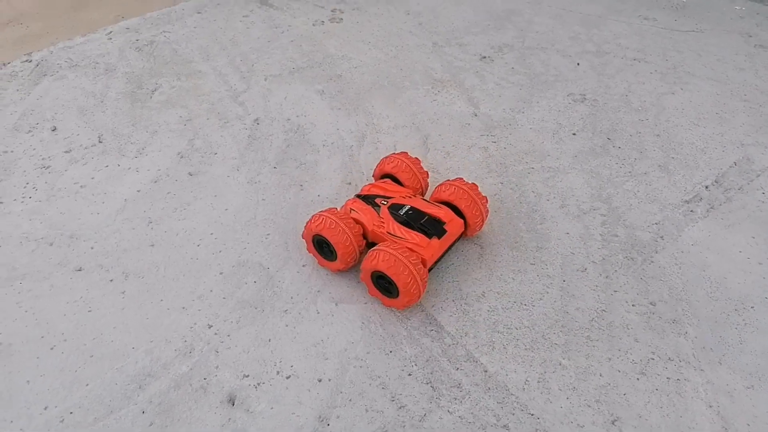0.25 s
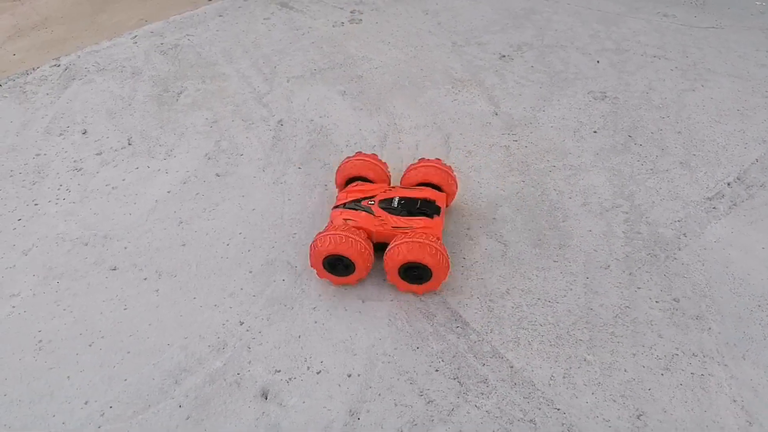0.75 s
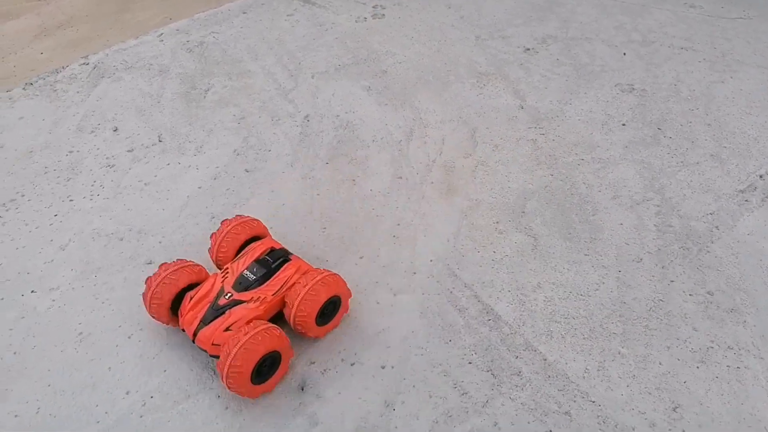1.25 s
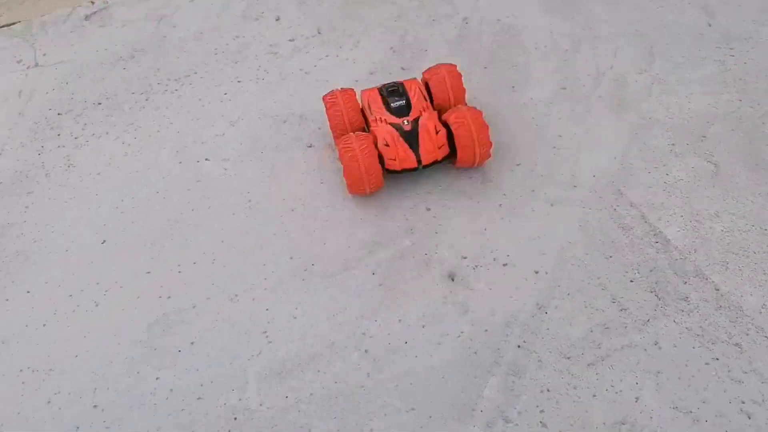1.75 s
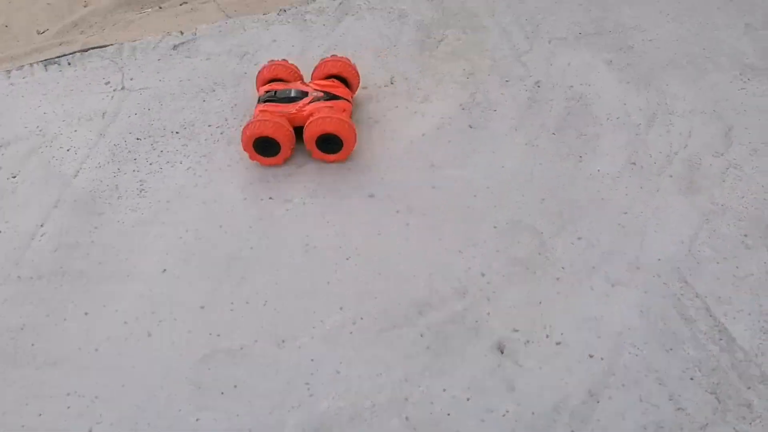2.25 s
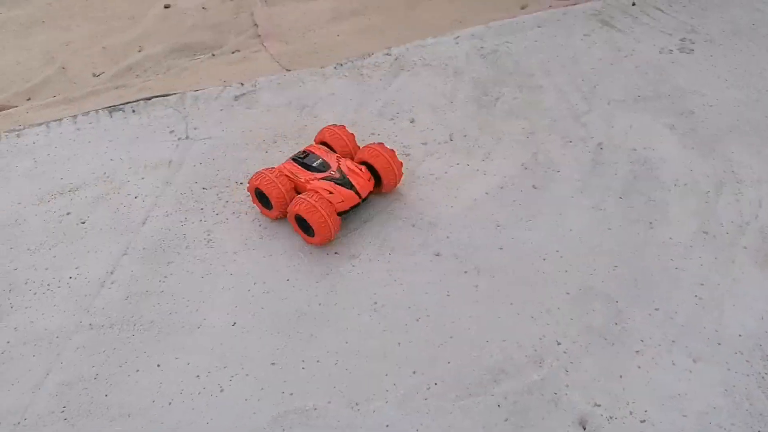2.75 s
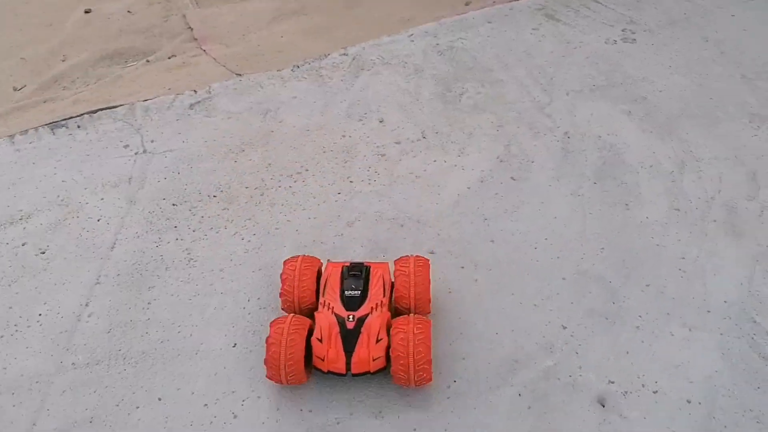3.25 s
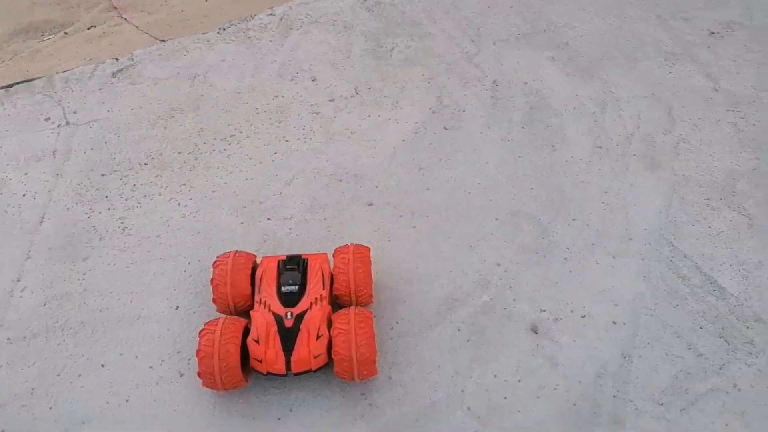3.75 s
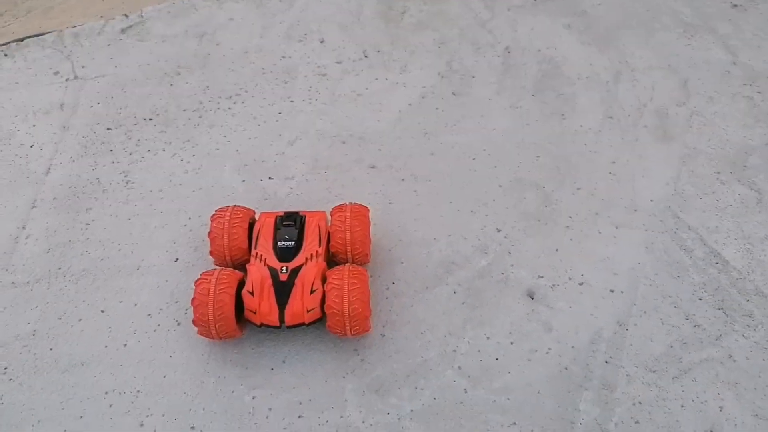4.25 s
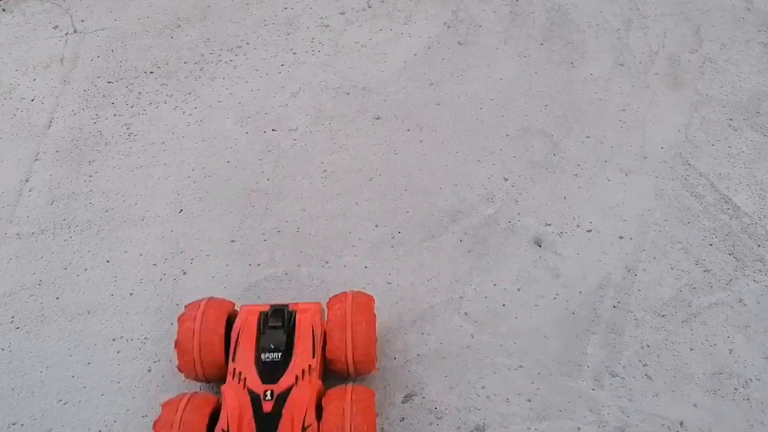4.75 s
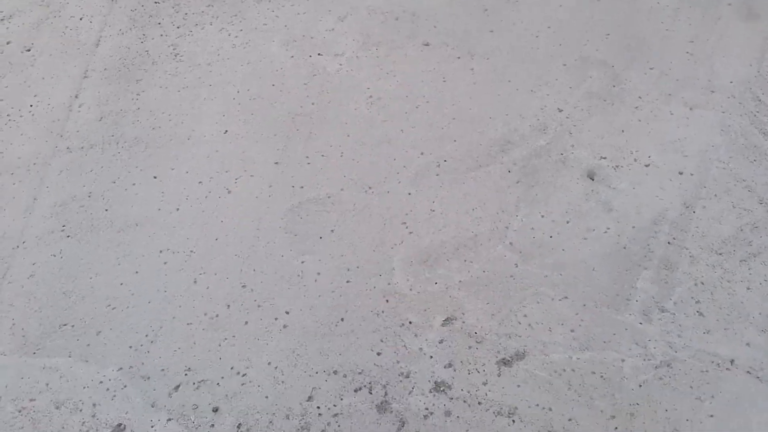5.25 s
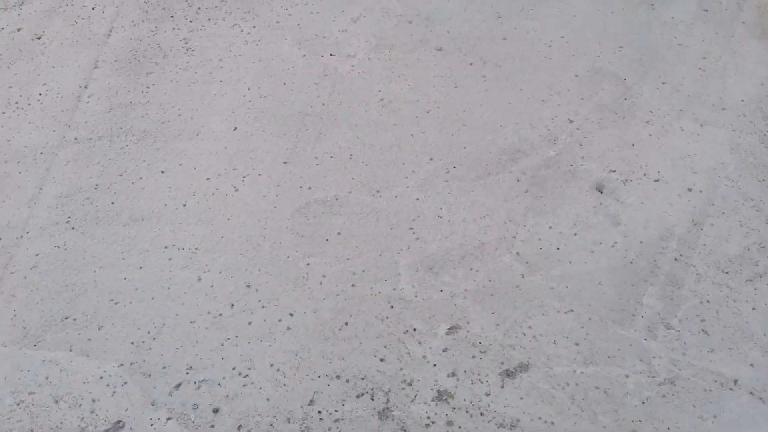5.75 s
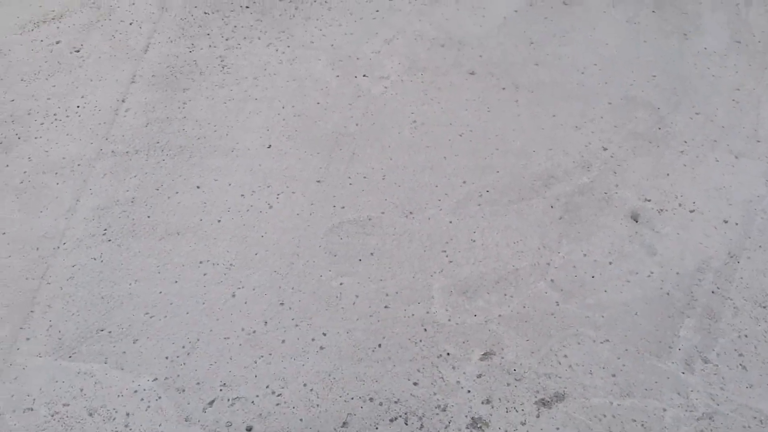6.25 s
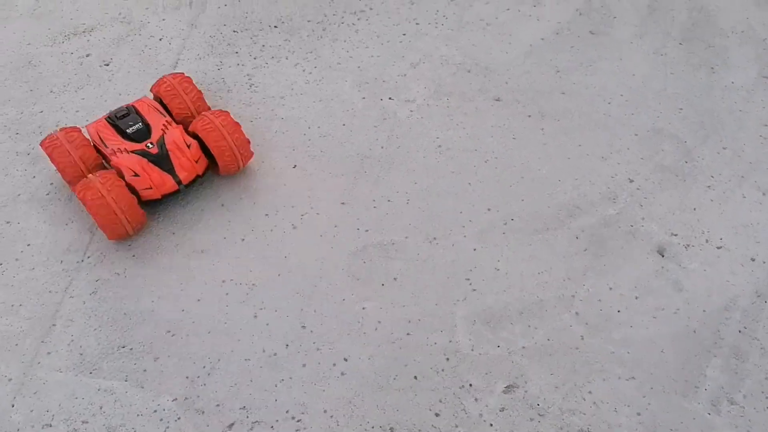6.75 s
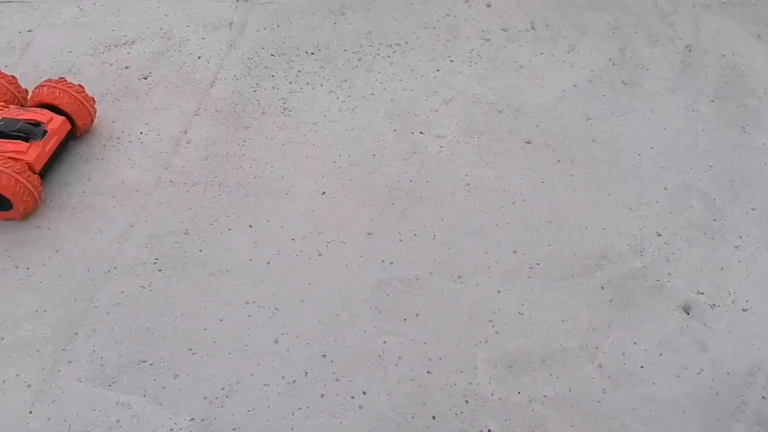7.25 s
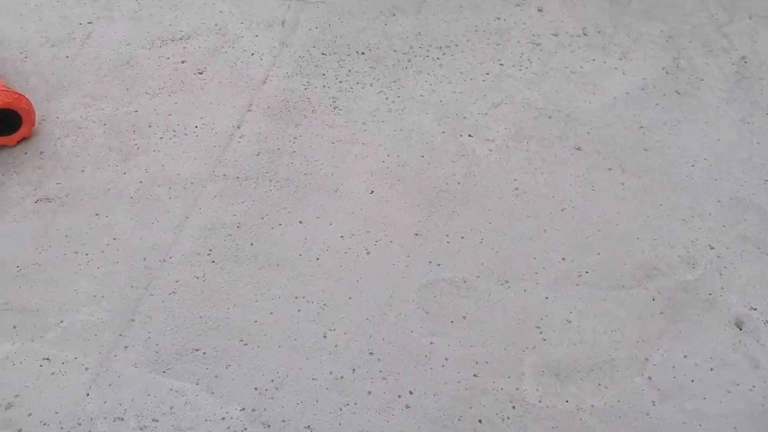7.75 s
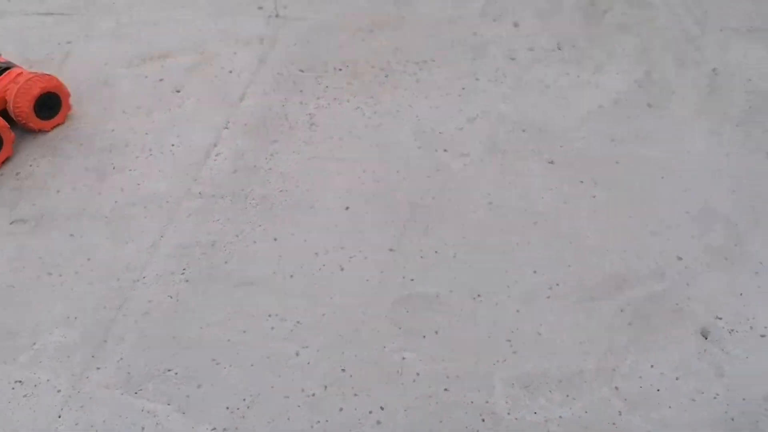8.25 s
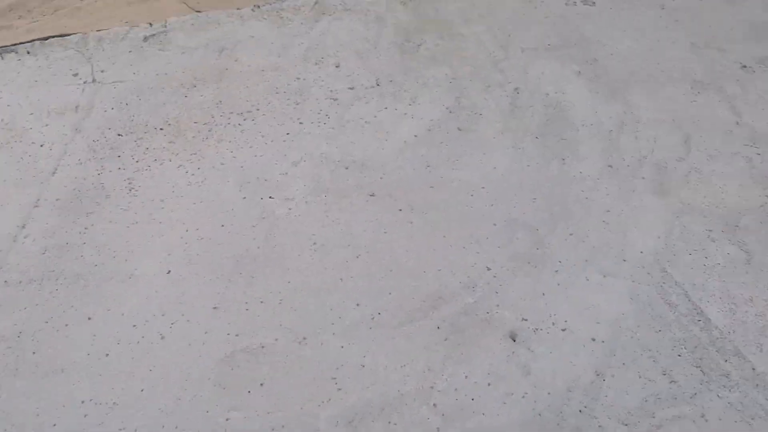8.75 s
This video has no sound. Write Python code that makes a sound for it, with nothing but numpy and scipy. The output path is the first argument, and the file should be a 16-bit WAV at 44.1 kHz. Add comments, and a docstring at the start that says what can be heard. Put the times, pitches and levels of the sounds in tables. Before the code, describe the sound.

Close stereo pickup outdoors: tiny motors and plastic gears buzz at a middling-high pitch, wavering as tyres grip and slip. Short weak revs come first, then stronger sustained whirring with dull bumps, a rumbling run over concrete, a pause, and a wilder passage of whining, scraping grit and hollow thumps. A brief drop precedes a final loud surge, over a very quiet rumbling background.

```python
"""A toy remote-control car whines and rattles in short bursts as it darts about on outdoor concrete, close by.
Its two small motors, one a side, are driven in stages and coast in between; they are heard as the tooth strikes
of plastic gears. The gears rattle the shell, made from tiny random impacts. Hollow knobbly tyres drum,
bump and skid on the grit, made from filtered impacts, short ringing blows and fizzing noise.
Behind them lie a faint wash of air, a low rumble and swells of hum, all made from filtered noise."""
import sys
import numpy as np
from scipy import signal
from scipy.fft import rfft, irfft
from scipy.io import wavfile
from scipy.ndimage import uniform_filter1d, minimum_filter1d, map_coordinates

SR = 44100
rng = np.random.default_rng(int(sys.argv[2]) if len(sys.argv) > 2 else 0)


def master(y):
    """Save y as 16-bit WAV."""
    cut = np.clip(np.atleast_2d(y).T, -1, 1)
    pcm = np.round(cut * 32767)  # scale
    wavfile.write(sys.argv[1], SR, pcm.astype(np.int16))


N = 396900
T = np.arange(N) / SR


def throttle():
    """Each stage draws the motors toward a new speed and loads the gears; then friction slows and quietens them."""
    # The stages of the driving. Each row: start in seconds, time held in seconds, tooth rate aimed at in Hz,
    # the same for the other side in Hz, slowing afterwards in Hz per second, attack in seconds,
    # gear level in dB, rattle level in dB, tyre drumming level in dB, roughness from 0 to 1,
    # lift of the octave overtone in dB, lift of the higher overtones in dB,
    # grit under the rolling tyres against the rattle in dB.
    stages = [ (-.1, 0.066, 590, 697, 2200, 0.021, -33.5, -35.5, -42, 0.23, -6, 1, -3),
              (.205, 0.17, 1138, 963, 1980, 0.032, -22, -28.5, -40, 0.34, -2.5, 4.5, 1),
              (.4, .14, 1300, 1220, 5000, 0.035, -23.5, -26.5, -40, 0.4, 2, 2, -4),
              (.55, .15, 1290, 1239, 5504, .025, -23, -27, -41, 0.28, 9.5, 2, -3),
              (.76, 0.032, 1004, 1093, 2000, 0.014, -24.5, -32.5, -46, 0.55, -4, -2, -5.5),
              (.91, 0.16, 1240, 1124, 3010, 0.027, -25, -36, -47, .28, 4.5, -3, 2.5),
              (1.121, 0.08, 950, 1267, 2492, 0.03, -28.5, -35.5, -45, 0.59, 3, 4, 2.5),
              (1.33, .14, 596, 897, 3517, 0.097, -26.5, -35, -36, 0.65, -8, 7, -11),
              (1.52, 0.19, 956, 996, 199.7, 0.061, -17, -27.5, -45, 0.39, 8.5, 6.5, -1),
              (1.75, 0.089, 901, 1287, 200, 0.019, -21.5, -27, -45, .33, 1, -7, -4.5),
              (1.85, .11, 869, 904, 950, .021, -18, -29, -45, 0.42, 7.5, -8, -1),
              (2.56, 0.21, 1249, 1157, 2008, 0.088, -20, -20.5, -38, 0.33, 7, 5, -5),
              (2.8, .45, 1372, 1326, 3992, 0.11, -19, -21.5, -41, 0.31, 4.5, 5, -1.5),
              (3.32, .19, 1096, 1057, 5995, 0.028, -19.5, -29.5, -32.5, .28, -7, -4, -1),
              (3.835, 0.19, 1020, 1209, 2000, 0.058, -21.5, -34, -37, .5, -15, -9, -9),
              (4.035, 0.22, 931.3, 903, 2015, 0.012, -18, -24.5, -35.5, 0.23, -7.5, -6, -0.5),
              (4.285, 0.44, 1147, 1089, 1999, .021, -18, -24, -32, 0.42, 3, 1, -1.5),
              (4.7, 0.32, 1143, 1067, 2013, 0.035, -18, -25, -30, 0.47, 1.5, -1.5, -1.5),
              (5.02, 0.72, 1055, 1110, 3497, 0.036, -18.5, -22.5, -27, 0.61, 4, 1.5, -3),
              (5.78, 0.078, 950, 1064, 7990, .017, -20, -24.5, -29, 0.49, -5, 7, -5),
              (5.91, 0.053, 602, 738, 994, .021, -34, -47, -44, 0.88, -1, 0, -3),
              (6.42, .13, 1403, 1000, 4018, 0.04, -19.5, -22.5, -40, .24, -1, -2, -6),
              (6.555, .05, 1330, 1201, 4495, 0.009, -16.5, -22, -39, 0.29, 2.5, 5, -10),
              (6.735, .09, 963, 858, 2000, 0.019, -19, -26, -40, .24, -5, 4, -3),
              (6.83, 0.049, 1698, 1001, 2000, .02, -14, -24, -40, .24, 0, 2, -1),
              (6.88, 0.19, 1344, 1146, 2005, .02, -17.5, -22, -37.5, 0.34, 2.5, 2, -4),
              (7.06, .22, 1564, 1423, 1995, .02, -17, -24, -39, .2, -1, 3, 0),
              (7.28, 0.21, 1544, 1478, 3510, 0.018, -18.5, -18, -38.5, 0.23, 5.5, -2.5, -5),
              (7.56, 0.066, 1187, 1210, 2402, .015, -15.5, -18.5, -26, 0.19, -3.5, -4, -10),
              (7.79, 0.13, 1401, 1305, 2009, .017, -18.5, -24, -32, 0.2, -1.5, -1, 0),
              (7.93, .24, 1686, 1549, 8910, .017, -18.5, -25.5, -37, 0.25, 5, 2, 1),
              (8.236, .24, 1465, 1114, 2390, 0.01, -22.5, -26.5, -43, 0.55, 8.5, 5.5, -11),
              (8.78, 0.18, 1126, 999, 2003, .015, -15.5, -23.5, -42, 0.42, 1.5, 6.5, -2),
              (8.93, 0.18, 1174, 1190, 1986, .019, -9, -13.5, -41, .36, -2, 0, -0.5)]
    approach_s, crawl_hz = .085, 119.7  # time to near the speed aimed at; slowest tooth rate
    slowing_share = np.c_[[1, .65]]  # the other side rolls on more freely
    # one value each for gears, rattle and tyres
    lag = np.c_[[0.74, 1.04, 1]]  # factor on the attack
    halving_db = np.c_[[9.5, 15, 4]]  # fall per halving of speed
    unload_db = np.c_[[2, 2.5, 2.5]]  # fall when the power is cut
    unload_s, coast_rough = .02, .31  # unloaded teeth go slack and chatter more
    start_rough, start_below_hz = .35, 1000  # a slow motor judders until it passes this tooth rate

    speeds, levels = np.full((2, N), 500.), np.full((3, N), -45.)
    rough, lifts_db, grit_db = np.zeros(N), np.zeros((2, N)), np.zeros(N)
    ends = [row[0] for row in stages[1:]] + [T[-1] + 1]
    for row, end in zip(stages, ends):
        s, held, top_hz, other_hz, slowing, attack = row[:6]
        gear_db, rattle_db, tyre_db, chatter, octave_db, upper_db, rolling_db = row[6:]
        now = np.flatnonzero((T >= s) & (T < end))
        before = [max(now[0] - 1, 0)]
        t = T[now] - s
        driven_s, coasted_s = np.minimum(t, held), np.maximum(t - held, 0)

        aim = np.c_[[top_hz, other_hz]]
        driven = aim + (speeds[:, before] - aim) * np.exp(-driven_s / approach_s)
        speeds[:, now] = np.maximum(driven - slowing * slowing_share * coasted_s, crawl_hz)

        slack = 1 - np.exp(-coasted_s / unload_s)
        full = np.c_[[gear_db, rattle_db, tyre_db]]
        loaded = full + (levels[:, before] - full) * np.exp(-driven_s / (attack * lag))
        slowed_octaves = np.log2(speeds[0, now] / driven[0])
        levels[:, now] = loaded + halving_db * slowed_octaves - unload_db * slack

        judder = start_rough * np.clip(1 - driven[0] / start_below_hz, 0, 1)
        rough[now] = chatter + judder + coast_rough * slack
        grit_db[now] = rolling_db
        lifts_db[:, now] = np.c_[[octave_db, upper_db]]
    rough, lifts_db, grit_db = (uniform_filter1d(x, size=1500) for x in (rough, lifts_db, grit_db))
    return speeds, levels, np.clip(rough, 0, 1), lifts_db, grit_db


def gripping(late_s=0):
    """A skipping tyre grips and drags its motor down: sag in Hz, and the load from 0 to 1 on its teeth."""
    # The grips. Each row: slowest moment in seconds, length of the drag in seconds,
    # sag of the tooth rate in Hz before a slight smoothing.
    grips = [(.31, 0.044, 70.1), (.40, 0.027, 70.6), (.52, 0.044, 100.7), (0.606, .03, 90.8),
             (0.651, 0.018, 111.2), (2.775, 0.051, 90), (2.882, 0.039, 150), (2.932, .027, 180.4),
             (3.0, 0.044, 181.5), (3.062, .022, 130.4), (3.17, 0.074, 149.6), (3.265, .044, 140),
             (4.29, .03, 90), (4.38, 0.048, 130), (4.541, .043, 149.5), (4.595, 0.028, 199.7),
             (4.76, 0.052, 189.7), (4.91, 0.035, 171), (5.2, 0.084, 170), (6.548, .028, 480),
             (6.825, .032, 130), (6.915, .03, 380), (7.008, .042, 320), (7.1, .062, 320), (7.195, .07, 350),
             (7.28, .058, 300), (7.35, .038, 270), (7.425, .035, 150), (7.915, .042, 90),
             (7.995, .028, 210), (8.091, .034, 330), (8.175, .038, 580), (8.895, 0.028, 108.8),
             (8.965, .026, 150.6)]
    regain_s = .024  # the motor races back up once the tyre lets go
    sag, load, t = np.zeros(N), np.zeros(N), np.arange(8000) / SR
    for s, drag, hz in grips:
        start = s + late_s - drag
        add(sag, start, hz * np.interp(t, [0, drag, drag + regain_s], [0, 1, 0]))
        add(load, start, np.sin(np.pi * np.minimum(t / drag, 1)))
    return uniform_filter1d(sag, size=300), load


def gearbox(mesh_hz, rough, lifts_db, count=10):
    """Teeth strike in turn; an off-centre pinion throbs once a turn, and slack teeth clatter."""
    # The overtones of the tooth strikes. Each row: multiple of the tooth rate, level in dB before the lifts.
    overtones = [(1, 1.5), (2, 6), (3, 2.5), (4, 3), (5, 1.5), (6, 0)]
    unsteady = 1 + (.004 + .02 * rough) * wander(70)
    teeth = np.cumsum(mesh_hz * unsteady) / SR + .024 * wander(250)  # counts the teeth that have passed
    pinion = np.cos(2 * np.pi * teeth / count)
    teeth = teeth + .035 * pinion
    octave_db, upper_db = lifts_db
    whine = np.zeros(N)
    for k, db in overtones:
        # each overtone reaches the air with its own delay, and flares and fades as the load shifts
        level_db = db + (k == 2) * octave_db + (k > 2) * upper_db + 3.9 * wander(36)
        whine += amp(level_db) * np.cos(2 * np.pi * (k * teeth + rng.random()))
    contact = 0.87 + np.exp(-(teeth % 1) / 0.21)  # impacts are strongest just after a tooth meets
    clatter = unit(grains(5000, 1.3) * contact * amp(1.0 * wander(65)))
    return (1 + .4 * pinion) * ((1 - rough) * unit(whine) + rough * amp(5.5) * clatter)


def motors(speeds, rough, lifts_db, lowest_hz=720):
    """The two sides run at slightly different speeds; both sound through the same ringing shell."""
    # How loud the other side is, more while the car labours. Each row: tooth rate in Hz, level in dB.
    other_side = [(850, -2.5), (1250, -8)]
    # The colour of the shell. Each row: frequency in Hz, gain in dB.
    shell_colour = [(290, -21), (500, -5), (602, -8), (920, 5.5), (1050, 4.5), (1240, 4), (1410, -4),
                    (1770, -3), (2600, -7), (3000, -9.5), (3900, -6), (4730, -8.5), (6570, -22),
                    (7570, -25.5), (10500, -27), (15000, -67)]
    # The resonances of the shell. Each row: frequency in Hz, width in Hz, lift in dB.
    shell_modes = [(950, 160, -3), (1204, 280, 2), (1657, 310, 4.5), (2750, 450, 3), (4830, 3400, -2.5),
                   (7410, 920, 11.5)]
    # Level of the shell's bright resonance as the car turns. Each row: time in seconds, lift in dB.
    bright_lift = [(0, 4), (1.8, -4), (2.6, 0), (3.1, 1.5), (3.6, 8), (4.5, -1), (5.3, 1), (6.8, 4),
                   (7.1, 4.5), (8.2, -29), (8.8, 14), (8.95, 3.5)]
    near = gearbox(speeds[0], rough, lifts_db)
    far = amp(read(other_side, speeds[0])) * gearbox(speeds[1], rough, lifts_db)
    both = pair(ring(near + far, .016, -7), ring(near - far, .008, 18) * amp(-18))
    both = turning(both, depth_db=2.4, patch_hz=700, patch_s=.06)
    hz = np.fft.rfftfreq(N, 1 / SR)
    lift_db = sum(db / (1 + (2 * (hz - f) / width) ** 2) for f, width, db in shell_modes)
    radiated = 1 - 0.5 / (1 + (hz / lowest_hz) ** 12)  # the small shell sends out less bass
    heard = irfft(rfft(both) * amp(read(shell_colour, hz) + lift_db) * radiated, N)
    return heard + (amp(curve(bright_lift)) - 1) * band(heard, centre_hz=4830, width_hz=1200)


def turning(x, depth_db, patch_hz, patch_s):
    """The shell radiates unevenly as the car turns and shakes: bands swell and fade at random."""
    hz, t, z = signal.stft(x, SR, nperseg=512, noverlap=384)
    across = np.fft.fftfreq(len(hz), hz[1])[:, None] * patch_hz
    along = np.fft.fftfreq(len(t), t[1]) * patch_s
    noise = np.fft.fft2(rng.standard_normal((3, len(hz), len(t))))
    lobes = unit(np.fft.ifft2(noise * np.exp(-across ** 2 - along ** 2)).real)
    gain = amp(depth_db * (lobes[0] + .45 * lobes[1:]))  # one shared pattern, and one for each microphone
    return signal.istft(z * gain, SR, nperseg=512, noverlap=384)[1][:, :N]


def running(speeds, rough, lifts_db, grit_db, gear_gain, rattle_gain, split_hz=2850):
    """Gear whine below; above it, tooth rattle and grit that scrapes loudly when the tyres slide."""
    # Rubber slides on grit. Each row: start in seconds, length in seconds,
    # scrape level in dB before the treble gain, level in dB of the fizz of fine sand.
    skids = [(0.454, 0.22, -28.5, -61), (1.39, 0.091, -40.5, -51.5), (3.333, 0.23, -27.5, -42.5),
             (3.94, 0.062, -22.5, -62), (6.319, 0.092, -30.5, -51), (6.565, 0.063, -22.5, -44),
             (7.447, 0.13, -29, -68), (7.826, 0.21, -16.5, -58), (8.038, 0.16, -27, -65),
             (8.246, 0.085, -17, -42), (8.379, 0.12, -20.5, -47)]
    # The colour of the scraped grit. Each row: frequency in Hz, gain in dB.
    grit_colour = [(880, -56), (1500, -7), (1730, -4), (2180, -3), (2620, 1), (4200, -5.5), (7420, -9.5),
                   (9350, -14.5), (11200, -31.5), (15000, -40)]
    # The colour of the fizzing sand. Each row: frequency in Hz, gain in dB.
    fizz_colour = [(5000, -40), (9000, 0), (11000, 4), (13000, -3), (15000, -12)]
    gears = motors(speeds, rough, lifts_db)
    body = shape(gears, lambda hz: 1 / (1 + (hz / split_hz) ** 8))
    rattle = steadied(gears - body, 2400, 10000)
    scrape = colour(pair(grains(9000, 0.99), grains(9000, 1.0)), grit_colour) * amp(1.6 * wander(40))
    scrape = steadied(scrape, 2400, 10000)
    sand = unit(colour(pair(grains(12000, 1.1), grains(12000, 1.1)), fizz_colour))
    skid, fizz = np.zeros(N), np.zeros(N)
    for s, length, scrape_db, fizz_db in skids:
        sliding = window(s, length, edge=0.049)
        skid += amp(scrape_db) * sliding
        fizz += amp(fizz_db) * sliding
    grit_gain = np.hypot(skid, amp(grit_db) * rattle_gain)  # sliding and rolling together
    treble = rattle_gain * rattle + grit_gain * scrape
    return amp(2.0) * steadied(body, 750, 2850) * gear_gain + amp(1.5) * treble + fizz * sand


def tyres(gain):
    """Tread knobs drum on the concrete and boom in the hollow wheels."""
    # The colour of the drumming tyres. Each row: frequency in Hz, gain in dB.
    tyre_colour = [(100, -18), (205, -7), (270, -2), (315, 4), (380, 1), (480, 3.5), (680, 3.5),
                   (1000, 6.5), (2000, -31), (8000, -70)]
    knobs = [ring(grains(350, 2.1), 0.029, 8.9) for _ in range(2)]
    drum = steadied(colour(pair(*knobs), tyre_colour), 250, 650)
    return amp(1.5) * drum * gain


def hits(rows, rise, width, tone):
    """Each blow rings one short mode, wrapped in a burst of rattle around its pitch."""
    out, t = np.zeros(N), np.arange(6000) / SR
    for s, db, hz, t60 in rows:
        def around_pitch(f):
            return 1 / (1 + (np.log((f + 1) / hz) / width) ** 2) / (1 + (f / (3 * hz)) ** 4)
        rattle = unit(shape(rng.standard_normal(len(t)), around_pitch))
        mode = tone * np.sin(2 * np.pi * hz * t)
        blow = (rattle + mode) * amp(-60 * t / t60) * (1 - np.exp(-t / rise))
        add(out, s, amp(db) * blow / abs(blow).max())
    return out


def bumps(t60=0.13):
    """A tyre lands or the chassis jolts: dull blows with a soft start."""
    # The bumps. Each row: start in seconds, peak in dB before the common gain, pitch in Hz.
    bump_rows = [(0.435, -8, 730), (0.537, -11, 518), (0.608, -12.5, 464), (1.407, -24, 397),
                 (2.98, -15, 480), (3.154, -9.5, 657), (3.231, -2.5, 673), (3.323, -8, 808),
                 (3.437, -2.5, 750), (3.42, -11.5, 480), (3.522, -14, 558.5), (3.6, -12, 419),
                 (5.168, -8, 657), (5.778, -12, 665.7), (6.462, -17, 446.6), (6.6, -16, 439),
                 (6.532, -8, 665), (6.938, -15, 500), (7.61, -11, 363.2), (7.695, -18, 872),
                 (7.725, -10.5, 419.4), (7.803, -3, 800), (7.923, -12, 572), (8.164, 2.5, 892),
                 (8.263, -5, 874)]
    return amp(-3.0) * hits([(*row, t60) for row in bump_rows], rise=.0018, width=0.74, tone=0.7)


def snaps():
    """Plastic snaps, gear slack and flicked grit: blows with a sharp start and a clear pitch."""
    # The snaps. Each row: start in seconds, peak in dB before the common gain, pitch in Hz,
    # time to die away by 60 dB in seconds.
    snap_rows = [(1.9989, -17, 1617, 0.091), (2.737, -4, 2173, 0.019), (2.745, -10, 2607, 0.059),
                 (3.5995, -14.5, 799, 0.028), (3.6625, -11.5, 3150, 0.03), (3.694, -21, 3100, 0.029),
                 (3.8121, -24.5, 2220, 0.018), (3.849, -28.5, 1300, 0.052), (4.645, -13, 1204, 0.029),
                 (5.7605, -9.5, 1740, 0.054), (5.828, -8, 2690, 0.024), (5.916, -15, 3770, 0.017),
                 (5.918, -22, 1494, 0.078), (5.953, -15.5, 1144, .05), (6.467, -25, 1190, 0.04),
                 (6.7463, -14.5, 1543, 0.042), (8.714, -33, 6030, .015), (8.7595, -30, 3500, 0.018),
                 (8.785, -11.5, 1582, 0.15), (8.811, -15, 2685, 0.055), (8.842, -9, 2985, 0.031)]
    return amp(2.0) * hits(snap_rows, rise=.0001, width=.3, tone=1.8)


def placed(car):
    """The car's bearing delays and shades one microphone against the other."""
    # Where the car is. Each row: time in seconds, lead of the left microphone in milliseconds,
    # left over right in dB.
    bearing = [(0, -0.12, 0), (1.2, -0.071, 0), (1.8, -0.037, -1), (2.2, -0.12, 3.5), (2.7, .02, -1),
               (3.3, -0.16, -2.5), (3.7, -0.13, 3.5), (4.2, -0.00096, -1), (5.7, 0.0045, -1.1),
               (6.3, .25, 4), (6.7, 0.066, -.8), (7.2, .22, 0), (7.7, 0.19, 3.7), (8.2, 0.17, 2),
               (8.9, -0.052, -0.5)]
    lead_s, tilt_db = curve(bearing, axis=1) / 1000, curve(bearing, axis=2)
    heard = []
    for x, side in zip(car, (1, -1)):
        moved = map_coordinates(x, [(T + side * lead_s / 2) * SR], order=2, mode="nearest")
        heard.append(moved * amp(side * tilt_db / 2))
    return np.array(heard)


def outdoors():
    """A faint wash of the surroundings over a slowly swelling low rumble, both from filtered noise."""
    # The colour of the wash. Each row: frequency in Hz, gain in dB.
    air_colour = [(60, -31), (180, 7), (400, -8.5), (650, -14), (950, -0.5), (1400, -7), (2700, -3),
                  (4200, -7.5), (7500, -14), (11000, -25), (15000, -41)]
    # The colour of the rumble. Each row: frequency in Hz, gain in dB.
    low_colour = [(8.8, -37), (15, 9.5), (32, -4), (48, 7), (86, -1.5), (119, 0), (151, -8), (230, -10),
                  (300, -22), (510, -120)]
    # The swelling of the rumble. Each row: time in seconds, level in dB before a common cut.
    rumble_level = [(0, -25.5), (.7, -33), (1.8, -29.5), (2.25, -31), (2.7, -31), (5, -27.5), (5.7, -31.5),
                    (6.5, -29.5), (7.2, -28), (8.2, -36.5), (8.7, -27.5), (9, -26.5)]
    wash = unit(colour(pair(*rng.standard_normal((2, N))), air_colour))
    rumble = unit(colour(pair(*rng.standard_normal((2, N))), low_colour))
    return amp(-40) * wash + amp(curve(rumble_level) - 3.5) * rumble


def hum(width_hz=12):
    """A low hum swells in the surroundings: narrow bands of noise that fade in and out."""
    # The swells. Each row: start in seconds, length in seconds, pitch in Hz, level in dB.
    swells = [(0, 0.2, 75.3, -36), (0, 0.28, 115.8, -33), (2.063, 0.44, 47, -31),
              (3.67, 0.32, 114.1, -40.5), (5.945, 0.402, 82, -39.5), (8.518, 0.26, 114.5, -38)]
    out = np.zeros(N)
    for s, length, hz, db in swells:
        tone = unit(band(rng.standard_normal(N), hz, width_hz))
        out += amp(db) * window(s, length, edge=0.097) * tone
    return out


def amp(db):
    """Turns decibels into gain."""
    return np.exp(np.asarray(db) * (np.log(10) / 20))


def unit(x):
    """Scales to an rms (average strength) of 1."""
    return x / np.sqrt(np.mean(x ** 2) + 1e-20)


def curve(rows, axis=1):
    """Reads one column of a time table at every sample."""
    rows = np.array(rows, float)
    return np.interp(T, rows[:, 0], rows[:, axis])


def read(points, hz):
    """Reads a frequency table on a log-frequency axis."""
    f, value = np.transpose(points)
    return np.interp(np.log(hz + 1), np.log(f + 1), value)


def shape(x, gain):
    """Filters by a gain that is a function of frequency."""
    return irfft(rfft(x) * gain(np.fft.rfftfreq(x.shape[-1], 1 / SR)), x.shape[-1])


def colour(x, points):
    """Filters by a frequency table."""
    return shape(x, lambda hz: amp(read(points, hz)))


def band(x, centre_hz, width_hz):
    """Passes one bell-shaped band."""
    return shape(x, lambda hz: np.exp(-(2 * (hz - centre_hz) / width_hz) ** 2))


def wander(hz, size=16):
    """Smooth random drift of rms 1, mostly slower than a rate; drawn once per `size` samples."""
    steps = rng.standard_normal(25000)
    slow = irfft(rfft(steps) / (1 + (np.fft.rfftfreq(len(steps), size / SR) / hz) ** 4))
    return unit(np.interp(np.arange(N) / size, np.arange(len(slow)), slow))


def steadied(x, lo_hz, hi_hz):
    """Scales a stereo sound to a running rms of 1 in one band."""
    power = (shape(x, lambda f: (f > lo_hz) & (f < hi_hz)) ** 2).mean(0)
    smooth = uniform_filter1d(uniform_filter1d(power, size=1700), size=1100)
    return x / np.sqrt(abs(smooth) + 1e-12)


def pair(a, b):
    """Two microphones hear much the same bass but ever less alike treble."""
    # How alike left and right are. Each row: frequency in Hz, likeness from 0 to 1.
    likeness = [(100, 0.91), (600, 0.85), (1100, 0.83), (2200, 0.25), (5000, 0.072), (12000, 0.036)]
    same = lambda hz: np.clip(read(likeness, hz), 0, 1)
    mid = shape(a, lambda hz: np.sqrt(1 + same(hz)))
    side = shape(b, lambda hz: np.sqrt(1 - same(hz)))
    return np.array([mid + side, mid - side])


def ring(x, t60, tail_db, count=3):
    """A direct blow, then dense short ringing of plastic parts in slowly shifting shares."""
    t = np.arange(4096) / SR
    tails = rng.standard_normal((count, len(t))) * amp(-60 * t / t60)
    tails /= np.linalg.norm(tails, axis=1, keepdims=True)
    shares = np.array([wander(3.64) for _ in range(count)])
    shares /= np.linalg.norm(shares, axis=0)
    return x + amp(tail_db) * signal.oaconvolve(x * shares, tails, axes=1)[:, :N].sum(0)


def grains(per_s, spread_db):
    """Random tiny impacts, a few of them larger."""
    at, out = np.flatnonzero(rng.random(N) < per_s / SR), np.zeros(N)
    size, sign = rng.standard_exponential(len(at)), np.sign(rng.random(len(at)) - .5)
    out[at] = sign * amp(spread_db * np.minimum(size, 4))
    return unit(out)


def add(mix, s, sound):
    """Mixes a sound in at a time."""
    part = mix[max(round(s * SR), 0):][:len(sound)]
    part += sound[:len(part)]


def window(s, length, edge):
    """Opens at a time and closes after a length, with soft edges."""
    return np.clip(np.minimum(T - s, s + length - T) / edge + .5, 0, 1)


def limited(x, ceiling=0.86):
    """A fast limiter turns both channels down around the highest peaks."""
    gain = np.minimum(1, ceiling / (abs(x).max(0) + 1e-9))
    return x * uniform_filter1d(minimum_filter1d(gain, size=301), size=301)


def scene():
    """The car, its knocks and the open air."""
    # The driving sound drops briefly, as the gears run slack or stop.
    # Each row: start in seconds, length in seconds, change in dB.
    lulls = [(1.966, 0.034, -8.5), (2.408, 0.15, -1), (2.507, 0.068, -6), (3.271, 0.036, -1),
             (5.73, 0.056, -3), (5.868, 0.032, -7), (6.613, 0.13, -2), (8.185, 0.033, -11),
             (8.702, 0.075, -35)]
    speeds, levels, rough, lifts_db, grit_db = throttle()
    sag, load = gripping()
    other_sag, _ = gripping(late_s=.012)

    # the harder the tyres drum, the more the speed wobbles: a share of .035 at a drumming level of -30 dB
    wobble = .035 * amp(levels[2] + 30) * np.array([wander(38), wander(30)])
    speeds = (speeds - np.array([sag, .9 * other_sag])) * (1 + wobble)
    rough = np.clip(rough * (1 - 0.25 * load), 0, 1)  # loaded teeth chatter less

    lull_db = sum(db * window(s, length, edge=.009) for s, length, db in lulls)
    # uneven ground shakes the level of gears, rattle and tyres, by these dB
    gear_gain, rattle_gain, tyre_gain = (amp(level + lull_db + flutter_db * wander(25.5))
                                         for level, flutter_db in zip(levels, (0.46, 1, 1.5)))
    gear_gain = gear_gain * amp(0.5 * load)  # loaded teeth sing louder
    drive = running(speeds, rough, lifts_db, grit_db, gear_gain, rattle_gain)
    return placed(drive + tyres(tyre_gain) + bumps() + snaps()) + outdoors() + hum()


def record(dry):
    """The two microphones differ in the treble; then come the limiter and a cut of the highest treble."""
    tilt_db = [(2500, 0.0), (4500, 0.5), (7800, 8.5), (10500, -6.0), (14000, -1)]  # (Hz, left over right dB)
    edge_hz = 15200
    heard = np.array([shape(x, lambda hz: amp(side * read(tilt_db, hz) / 2)) for x, side in zip(dry, (1, -1))])
    lowpass = signal.firwin(511, edge_hz, window=("kaiser", 9), fs=SR)
    return signal.oaconvolve(limited(heard), lowpass[None], "same")


dry = scene()
out = record(dry)
master(out)
```